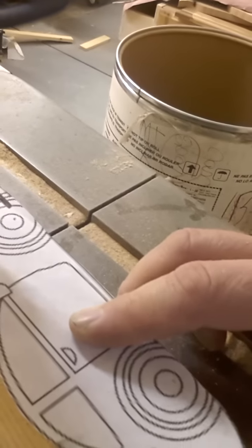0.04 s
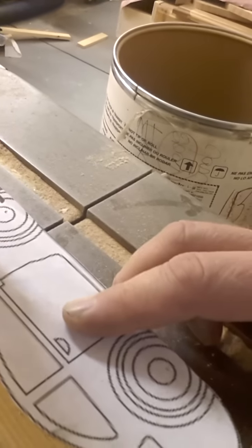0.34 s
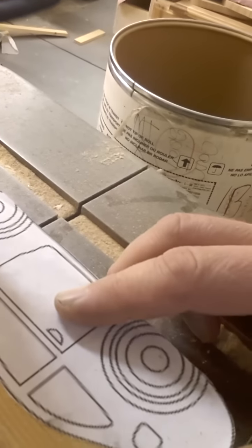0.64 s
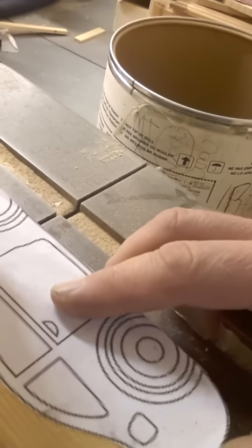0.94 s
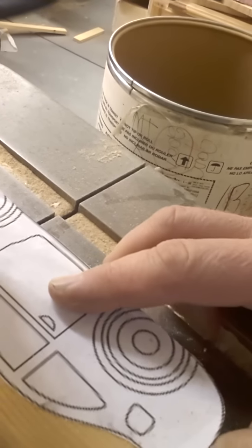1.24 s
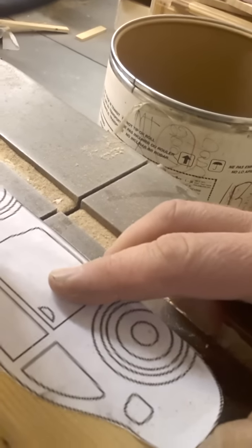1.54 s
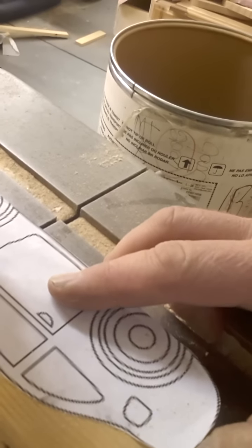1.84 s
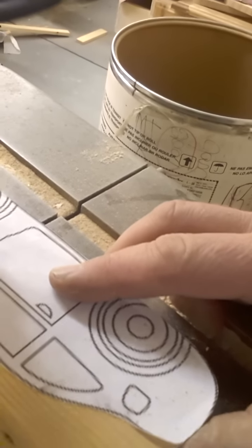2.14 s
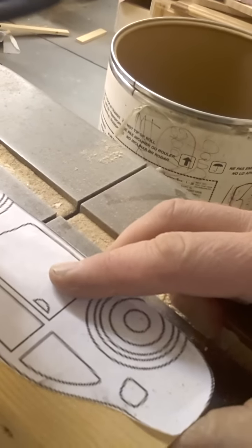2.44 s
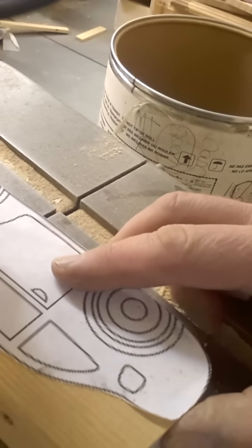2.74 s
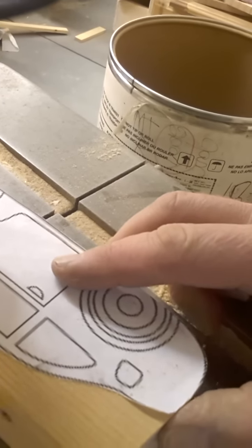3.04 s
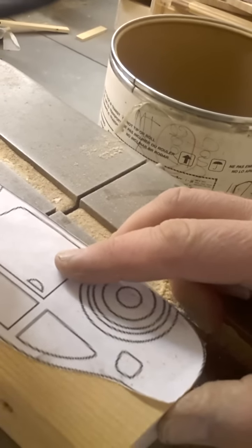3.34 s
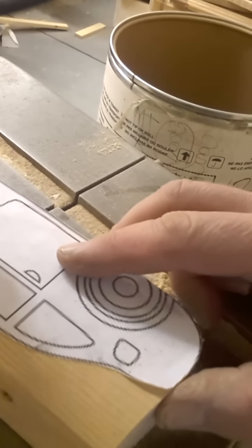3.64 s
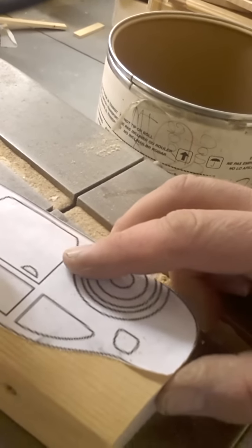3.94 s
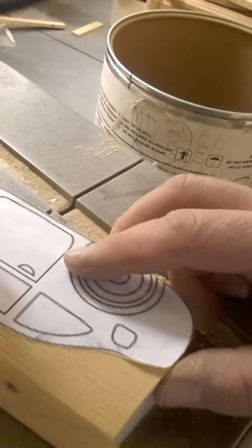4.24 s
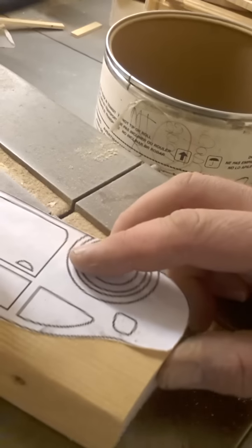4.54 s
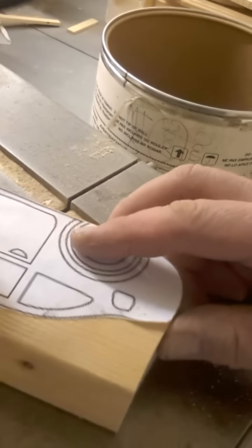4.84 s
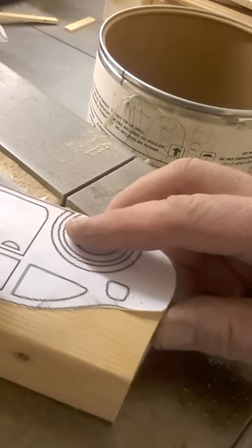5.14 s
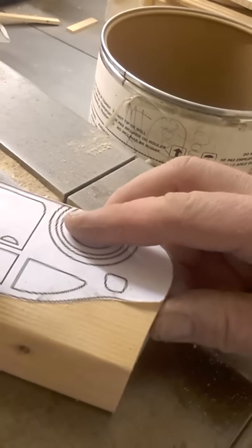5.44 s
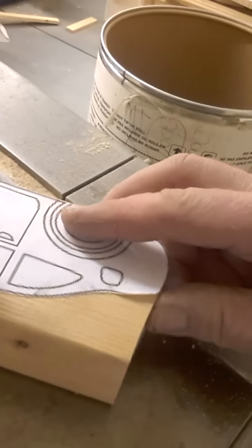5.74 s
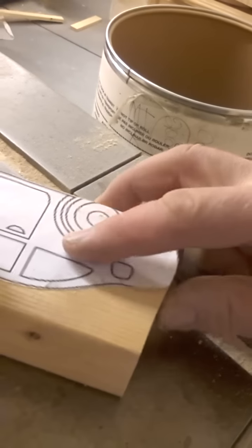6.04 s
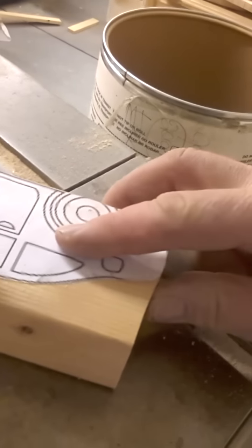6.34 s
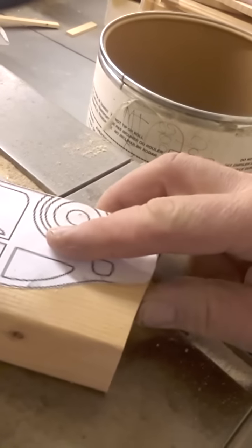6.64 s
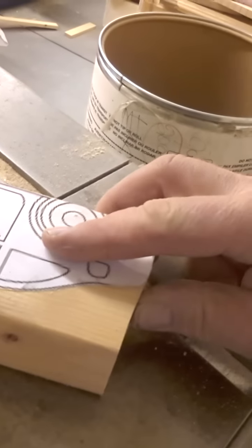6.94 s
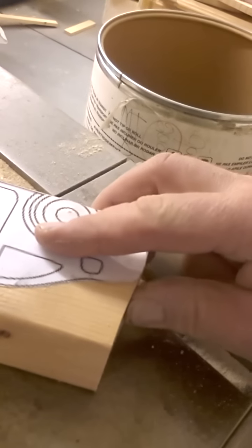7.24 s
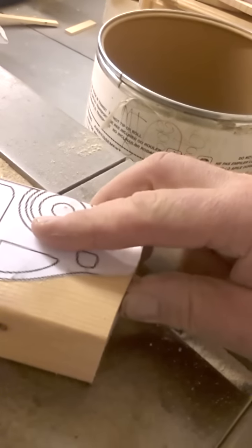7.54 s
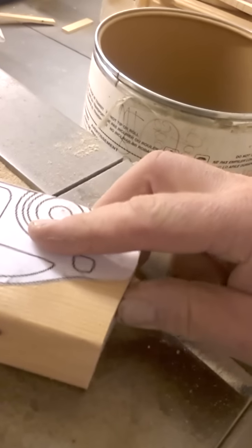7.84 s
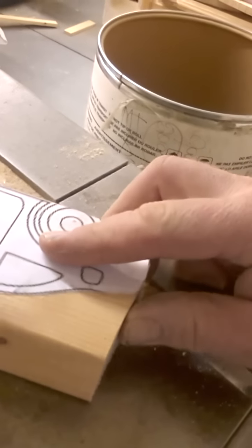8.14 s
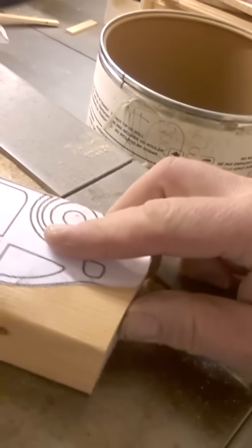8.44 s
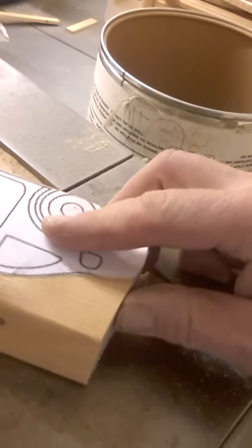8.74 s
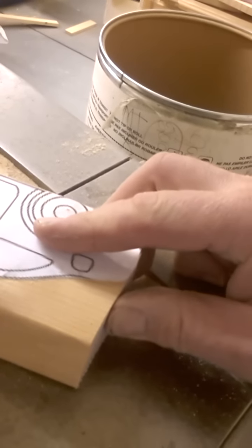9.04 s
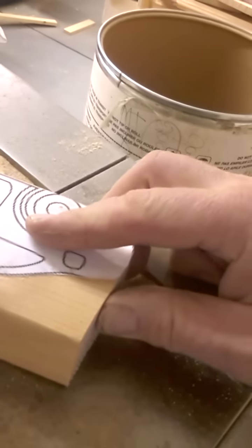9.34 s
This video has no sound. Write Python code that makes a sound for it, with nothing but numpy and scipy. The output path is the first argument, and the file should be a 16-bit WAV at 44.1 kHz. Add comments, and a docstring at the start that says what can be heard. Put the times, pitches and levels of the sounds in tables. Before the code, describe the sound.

A bandsaw rasps and squeals through a wooden board up close, its steel blade chattering over a humming motor.

```python
"""You hear a bandsaw rasp and squeal as it cuts a curve in a softwood board, up close in a small workshop.
The teeth tear the wood and set the steel band ringing. The band slaps its guides in a pattern that
returns with every lap, and squeals as the board twists it. In the turn the hand pushes and eases by
fits; twice it pushes long and hard, the teeth bite and the squeal is choked.
Underneath, the motor hums and the frame rumbles."""
import sys
import numpy as np
from scipy import signal
from scipy.fft import rfft, irfft
from scipy.io import wavfile
from scipy.ndimage import uniform_filter1d

SR = 44100
rng = np.random.default_rng(int(sys.argv[2]) if len(sys.argv) > 2 else 0)


def transcribe(u):
    """Save the signal u as a 16-bit wav file named by the first command-line argument.

    u: samples, shape (n,) or (channels, n), limited to [-1, 1]; the rate is SR.
    q: integer samples, one column per channel.
    """
    v = np.clip(np.atleast_2d(u).T, -1, 1)
    q = np.round(v * 32767).astype(np.int16)
    wavfile.write(sys.argv[1], SR, q)


N = 423360
TIME, FREQS = np.arange(N) / SR, np.fft.rfftfreq(N, 1 / SR)
LAP_HZ = 4.214  # laps of the band each second

# How hard the teeth drum on the wall of the cut. Each row: time in seconds, contact in dB.
WALL_CONTACT = [(0, -6), (.6, -6), (1.2, 3), (2.2, -1), (2.8, 2.5), (4.4, 6.5), (5.1, 3), (5.6, -1),
                (6.6, -2.5), (7.5, -1.5), (8.7, -4.5), (9.6, -3)]
# Turning the board presses the band sideways. Each row: time in seconds, pressure from 0 to 1.
SIDE_PRESSURE = [(0, 0.4), (3.4, 0.16), (4.5, 0.5), (5.7, 0.42), (6.1, .2), (6.5, 0.33), (7.4, 0.3),
                 (8.8, 0.5), (9.6, 0.25)]
# How far the left channel runs ahead of the right. Each row: frequency in Hz, lead in radians.
LEFT_LEAD = [(100, 0.77), (300, 0.22), (600, 1.58), (1200, 1.6), (2400, 1.38), (3600, 0.93), (5000, 1.7),
             (5700, 1.65), (7500, 1.1), (12000, 2.1)]


def steel_band(tearing, force, slack_db):
    """The teeth ring the band's modes (its natural tones); some of them shift as it twists."""
    # Each row: pitch in Hz, width in Hz, relative level in dB, left over right in dB.
    chatter_modes = [(3413, 200, 12.5, 2.4), (3765, 170, 15, 3.6), (3960, 310, 6.5, 2.3)]
    sizzle_modes = [(7500, 3900, -15, 11), (7520, 590, -7, -33.5), (8020, 440, -7.5, -23),
                    (8930, 420, 0.5, -6.5)]
    edge_modes = [(10770, 1860, -15.5, 3)]
    # The shifting modes. Each row: time in seconds, then chatter, sizzle and whistle pitch in Hz.
    twist = [(0, 3410, 7180, 11500), (1.6, 3320, 7020, 11100), (2.5, 3654, 6880, 10960),
             (4.3, 3575, 6820, 11090), (5.6, 3476, 6880, 11300), (7.15, 3610, 6870, 11440),
             (7.6, 3560, 7520, 11050), (9.6, 3360, 7410, 10730)]
    chatter_hz, sizzle_hz, whistle_hz = follow(twist)
    contact_db = follow(WALL_CONTACT)[0] - slack_db
    pressure, = follow(SIDE_PRESSURE)
    # the teeth stick out sideways and drum on the wall of the cut
    drumming = teeth(tear_db=1.5, lap_db=2.3, grain_db=0.8, bump_db=3.5)
    chatter = ring(drumming, chatter_modes) + amp(15) * pan(1.9) * resonate(teeth(), chatter_hz, 150)
    chatter = signal.sosfilt(signal.butter(6, 3100, "high", fs=SR, output="sos"), chatter)
    # each slap against the guide throws the teeth harder at the wall
    _, slap_pulse = slaps()
    chatter = at_level(chatter * (1 + 0.8 * slap_pulse), -23.5 + contact_db + 2 * force)
    # firm contact sharpens the sizzle into one moving mode
    sharp_mode = amp(6 + 0.74 * contact_db) * pan(-10) * resonate(teeth(), sizzle_hz, 340)
    sizzle = at_level(ring(tearing, sizzle_modes) + sharp_mode, -26.5 + 0.82 * contact_db + 6 * force)
    # past a certain side pressure the band's edge whistles louder
    whistle = pressure * pan(-17.5) * resonate(teeth(), whistle_hz, 330) + ring(tearing, edge_modes)
    whistle_db = -34.5 + 0.56 * contact_db + 22 * np.maximum(pressure - 0.22, 0)
    return chatter + sizzle + at_level(whistle, whistle_db)


def teeth(tear_db=1.5, lap_db=2.0, grain_db=1, bump_db=0.5, bumps_per_lap=33):
    """Teeth tear fibres; their unevenness repeats each lap, the grain of the wood does not."""
    laps = LAP_HZ * TIME
    uneven = np.interp(laps % 1 / LAP_HZ, TIME, wander(38))
    bumps = np.sin(2 * np.pi * bumps_per_lap * laps)
    tears = stereo_noise()
    return tears * amp(tear_db * wander(740) + lap_db * uneven + grain_db * wander(18) + bump_db * bumps)


def guides(load, slack_db, glide_s=0.0045, rest_hz=5725):
    """The band at its guides: slaps that chirp downward, a rubbed ring, and a throbbing squeal."""
    # Each row: time in seconds, relative level in dB, pitch in Hz, chirp's fall as a share of the pitch.
    slap_curve = [(0, -19.5, 5160, 0.41), (.8, -18, 4935, 0.2), (1.8, -22, 5010, 0.18),
                  (3.3, -22, 5090, 0.14), (4.8, -24, 5090, 0.23), (5.75, -21, 5450, .13),
                  (6.7, -24.5, 5520, 0.17), (7.3, -20, 5150, 0.28), (7.8, -21, 5020, 0.26),
                  (8.4, -19.5, 5220, 0.13), (8.75, -21.5, 4930, 0.092), (9.6, -21, 4980, 0.089)]
    # The twisted band squeals. Each row: time in seconds, relative level in dB.
    squeal_curve = [(0, -20.5), (.6, -20.5), (1.8, -16), (3.4, -21), (4.3, -20), (5.2, -22.5), (6.3, -20),
                    (6.95, -15.5), (7.3, -27.5), (7.9, -31), (8.38, -20.5), (8.6, -41), (9.05, -29.5),
                    (9.6, -22)]
    slap_db, slap_hz, glide = follow(slap_curve)
    slap_db = slap_db - 11 * load - 0.57 * slack_db
    squeal_db = follow(squeal_curve)[0] - 4.5 * load - 0.57 * slack_db
    squeal_hz = rest_hz + 290 * load + 18 * wander(3.1)
    # hard contact with the wall of the cut shakes the squeal and makes it rough
    squeal_hz += 28 * np.maximum(follow(WALL_CONTACT)[0] - 1, 0) * wander(230)
    pressure, = follow(SIDE_PRESSURE)
    age_s, pulse = slaps()
    friction, rubbing = stereo_noise(), stereo_noise()
    # high bending waves travel faster in steel, so each slap falls in pitch
    fall = np.exp(-age_s / glide_s) - 0.5
    chirps = saturate(resonate(friction, slap_hz * (1 + glide * fall), 560), 0.65)
    rubbed = saturate(resonate(rubbing, slap_hz, 130), 0.7)
    slap = pan(7.3) * (pulse * chirps / chirps.std() + 0.19 * (1 + pressure) * rubbed / rubbed.std())
    squeal = saturate(resonate(rubbing, squeal_hz + 110 * fall, 105), 0.65)
    # the squeal builds up just before each slap and is checked by it
    early_pulse = np.roll(uniform_filter1d(pulse, size=130), -130)
    throb = 0.35 + np.sqrt(abs(early_pulse))
    return at_level(slap, slap_db) + at_level(pan(5.4) * throb * squeal, squeal_db)


def slaps(per_lap=16.6, rise_s=0.0024):
    """Waves in the band hit the guide about 70 times a second: time since each hit, and its pulse."""
    lap, place = np.divmod(LAP_HZ * TIME, 1)
    number, part = np.divmod(place * per_lap, 1)
    lap, number = lap.astype(int), number.astype(int)
    age_s = part / (per_lap * LAP_HZ)
    pattern, chance = rng.standard_normal(17), rng.standard_normal((42, 17))
    size_db = 1.8 * pattern[number] + 1.6 * chance[lap, number]
    return age_s, amp(size_db) * age_s / rise_s * np.exp(1 - age_s / rise_s)


def whines(width_hz=130):
    """Single modes of the band swell up while it binds in the cut, fed by the teeth."""
    # Each row: middle and length in seconds, pitch in Hz, relative level in dB, left over right in dB.
    binds = [(.25, 0.62, 5230, -20.5, 11), (1.25, 1.14, 8960, -27.5, -11), (1.3, .6, 8050, -31, -8),
             (1.25, 0.27, 3390, -26, 4), (3.302, 1.6, 7050, -24, -13), (5.5, 1, 5170, -25, 14),
             (6.142, 0.1, 3585, -15, 5), (7.135, 0.078, 3465, -16, 2), (7.864, 0.065, 3520, -15.5, 5),
             (8.09, .06, 4100, -22, 14), (8.26, 0.067, 4080, -20.5, 13), (8.75, .3, 4980, -27, 6),
             (9.3, 0.88, 4856, -21, 2)]
    tearing, out = teeth(), 0
    for middle_s, length_s, hz, db, side_db in binds:
        tone = resonate(tearing, hz, width_hz)
        out += amp(db) * pan(side_db) * swell(middle_s, length_s / 2) * tone / tone.std()
    return out


def free_ring(tearing, slack_db):
    """The free length of band rings, more strongly and in flares once the cut turns."""
    # Each row: pitch in Hz, width in Hz, relative level in dB, left over right in dB.
    modes = [(2318, 20, 0, 5), (2439, 22, -2, 5)]
    # Each row: time in seconds, relative level in dB.
    steady_ring = [(0, -45), (2.8, -39), (4.4, -40.5), (6.2, -38), (6.7, -34), (9.6, -33)]
    # Each row: middle and length in seconds, relative level in dB.
    flares = [(6.437, 0.043, -34), (6.55, .04, -33), (6.791, 0.049, -25), (6.903, 0.044, -33),
              (7.11, .08, -27), (7.21, .05, -22.5), (7.5, 0.097, -36), (7.757, 0.037, -24),
              (7.884, .11, -19.5), (8.494, 0.065, -33), (8.82, 0.12, -29), (9.17, 0.07, -53),
              (9.448, 0.14, -34)]
    gain = amp(follow(steady_ring)[0] - slack_db)
    gain += sum(amp(db) * swell(middle_s, length_s / 2) for middle_s, length_s, db in flares)
    return gain * at_level(ring(tearing, modes), -2.5)


def wood_and_dust(tearing, force, slack_db):
    """The dry rasp of torn wood, and the hiss of spraying sawdust that grows with it."""
    # Each row: frequency in Hz, relative level in dB.
    wood_spectrum = [(200, -25), (400, -2), (550, 9.5), (660, -1), (880, 1), (1000, 8), (1070, 7),
                     (1250, 11), (1550, 0.5), (2250, 5), (2900, 2), (4500, 3), (6400, 5.5), (15000, -17.5)]
    dust_spectrum = [(3000, -42), (7000, -41), (9000, -1), (9700, 13), (10500, -23), (11800, -14),
                     (12600, -20), (13600, 11), (14600, 3)]
    # Each row: time in seconds, relative level in dB. The feed is brisk at first and slow in the turn.
    feed = [(0, -34.5), (.6, -35), (1.2, -32.5), (4.2, -34), (5.6, -37), (6.7, -37.5), (9.6, -36)]
    dust_curve = [(0, -42), (1.2, -45), (2.2, -49), (3.6, -70), (4.8, -38.5), (7.8, -35.5), (8.8, -44),
                  (9.6, -27)]
    rasp_db = follow(feed)[0] + 6.5 + 9 * force - 0.66 * slack_db
    dust_db = follow(dust_curve)[0] + 0.17 * (rasp_db - rasp_db.mean()) - 0.66 * slack_db
    spray = teeth(tear_db=2, lap_db=1, grain_db=2.5, bump_db=1)
    rasp = at_level(colour(tearing, wood_spectrum), rasp_db)
    return rasp + at_level(colour(spray, dust_spectrum), dust_db)


def bite(tearing, force, load):
    """Under a hard push the board shakes on the table and scrapes the sides of the band."""
    # Each row: frequency in Hz, relative level in dB.
    shake_spectrum = [(30, -30), (70, -20), (100, -22), (125, 57), (160, -67), (200, -5), (400, -24),
                      (900, -50)]
    # Each row: pitch in Hz, width in Hz, relative level in dB, left over right in dB.
    scrape_modes = [(3460, 45, 28.5, -6), (4037, 86, 10.5, 26), (6770, 590, 6, -21), (7570, 610, 2, -7)]
    shake = at_level(colour(stereo_noise(), shake_spectrum), -27.5)
    scrape = at_level(ring(tearing, scrape_modes), -23)
    return load * shake + force ** 1.07 * scrape


def knocks(rise_s=0.0015, fall_per_s=25):
    """The band catches and knocks against a guide: a falling chirp with a crack in it."""
    # Each row: start in seconds, relative level in dB, pitch in Hz.
    hits = [(4.1144, -12, 5600), (6.6368, -16, 5750), (7.2938, -10.5, 5400), (8.537, -16, 5100),
            (8.5517, -21, 5200), (8.5954, -7, 5130), (8.6515, -11, 5330), (8.954, -7.5, 5180),
            (8.985, -17, 5000), (9.0703, -16, 4970), (9.1945, -17, 5050)]
    out, t = np.zeros((2, N)), np.arange(SR // 50) / SR
    envelope = t / rise_s * np.exp(1 - t / rise_s)
    for start_s, db, hz in hits:
        chirp = np.sin(2 * np.pi * hz * (t - fall_per_s * (t - rise_s) ** 2 / 2))
        crack = 0.39 * rng.standard_normal((2, len(t)))
        start = round(start_s * SR)
        out[:, start:start + len(t)] += amp(db + 0.5) * (chirp + crack) * envelope
    return pan(1.6) * out


def sway():
    """The loose band leans into the wood and away again, so all its modes pulse together."""
    # Each row: time in seconds, rough depth of the pulsing in dB.
    depths = [(0, 1.7), (1.5, 2), (2.3, 2.5), (3.2, 2.5), (4.2, 2.3), (5.2, 1.2), (6, -0.1), (7.4, 1.9),
              (8.1, -1), (8.6, 3), (9.6, 2)]
    # Each row: swings per lap, strength as a factor.
    swings = [(8, .8), (9, .7), (14, .4), (15, .45), (16, .4)]
    lean = sum(size * np.sin(2 * np.pi * (rate * LAP_HZ * TIME + rng.random())) for rate, size in swings)
    gain = amp(follow(depths)[0] * np.tanh(0.7 * lean + 0.3 * wander(60)) / 0.6)
    return gain / np.sqrt(uniform_filter1d(gain ** 2, size=10000))


def hand(ramp_s=0.025, lag_s=0.035):
    """The hand's force on the board, the load that lags behind it, and the slack when it eases off."""
    # Each row: start and length in seconds, force from 0 to 1.
    pushes = [(0.244, .025, .8), (0.422, 0.054, 0.52), (0.907, 0.052, 0.34), (5.83, 0.4, 0.89),
              (6.75, .08, 0.34), (7.065, 0.11, 0.77), (7.32, 0.042, 0.6), (7.47, 0.045, .4),
              (7.589, 0.046, 1), (7.697, 0.089, 0.76), (7.801, 0.49, 0.9), (8.555, 0.052, 0.4),
              (8.813, 0.12, 0.1), (9.353, 0.049, 0.4), (9.452, 0.044, 0.9)]
    # The teeth run almost free. Each row: middle and length in seconds, drop in contact in dB.
    letups = [(0.296, .03, 6), (1.012, 0.019, 8), (6.626, 0.02, 4), (6.963, 0.047, 4), (7.31, 0.014, 13),
              (7.43, 0.073, 3.5), (7.55, 0.02, 9), (7.67, 0.022, 4), (8.365, 0.025, 7), (8.527, 0.018, 13),
              (8.693, 0.055, 3.5), (8.765, 0.03, 6), (8.977, 0.022, 10), (9.058, .022, 11),
              (9.324, 0.029, 5)]
    force = slack_db = 0
    for start_s, length_s, size in pushes:
        end_s = start_s + length_s + ramp_s / 2
        force += size * np.clip(np.minimum(TIME - start_s, end_s - TIME) / ramp_s, 0, 1)
    for middle_s, length_s, db in letups:
        slack_db += db * np.clip(1.5 - 2 * abs(TIME - middle_s) / length_s, 0, 1)
    decay = np.exp(-1 / (lag_s * SR))
    load = signal.lfilter([1 - decay], [1, -decay], force ** 2)
    return force, np.minimum(load, force), slack_db


def motor():
    """Mains hum and bearing whine: steady tones that waver a little."""
    # Each row: pitch in Hz, level in dB, waver in Hz.
    tones = [(120.1, -39, 0.26), (230.5, -60, 0.12), (477, -48.5, 0.88), (995, -49, 5.8),
             (1164, -44.5, 6.95), (1308, -41, 3.56), (1754, -48, 4.85)]
    hum = 0
    for hz, db, waver_hz in tones:
        phase = 2 * np.pi * np.cumsum(hz + waver_hz * wander(21.8)) / SR
        lead = np.interp(hz, FREQS, spectrum(LEFT_LEAD))
        hum += np.sqrt(2) * amp(db) * np.sin([phase, phase - lead])
    return hum


def drive_throb(hz=239.2, waver_hz=1.3):
    """The drive throbs; each listed swell stands for its tone falling into step with the hum."""
    # Each row: middle in seconds, relative level in dB.
    throbs = [(.02, -21), (.45, -30.5), (.96, -24.5), (1.4, -25.5), (1.8, -24), (2.32, -23.5),
              (2.66, -26.5), (3.12, -27.5), (3.47, -25), (3.96, -30.5), (4.62, -30), (4.9, -30),
              (5.35, -24), (5.78, -28.5), (6.09, -19), (6.45, -36), (6.75, -31.5), (7.1, -23.5),
              (7.48, -26.5), (7.78, -25), (8.17, -16), (8.58, -28.5), (8.87, -28), (9.4, -29)]
    tone = np.sqrt(2) * np.sin(2 * np.pi * np.cumsum(hz + waver_hz * wander(5.3)) / SR)
    return pan(0.45) * tone * sum(amp(db - 3) * swell(middle_s, 0.11) for middle_s, db in throbs)


def frame_rumble(load):
    """The sheet-steel frame rumbles, louder under load."""
    # Each row: frequency in Hz, relative level in dB.
    frame_spectrum = [(25, -61), (50, -42), (75, -27.5), (105, -18), (150, -14.5), (175, -19.5), (215, -5),
                      (295, 0), (350, -2.5), (385, -12), (415, -5.5), (460, -30), (700, -18.5), (1500, -41)]
    return at_level(colour(stereo_noise(), frame_spectrum), -30 + 7 * load)


def workshop(x, fade_s=0.093, patterns=12):
    """Short echoes from table and walls; they keep changing as hands and board move."""
    t, out = np.arange(SR // 4) / SR, 0
    fade = amp(-60 * t / fade_s) * (t > 0.002)
    for k in range(patterns):
        echoes = rng.standard_normal((2, len(t))) * (rng.random((2, len(t))) < 0.06) * fade
        echoes /= np.linalg.norm(echoes[0])
        share = np.maximum(1 - abs(np.linspace(0, patterns - 1, N) - k), 0)
        out += signal.oaconvolve(x * np.sqrt(share), echoes, axes=1)[:, :N]
    return out


def stereo_noise():
    """Noise that is partly alike on the left and right."""
    # Each row: frequency in Hz, likeness from 0 to 1.
    likeness = [(30, .7), (100, .96), (300, .95), (600, .45), (1300, .45), (2400, .85), (3600, .85),
                (5500, .8), (8000, .65), (12000, .5)]
    left, other = rfft(rng.standard_normal((2, N)))
    same = np.clip(spectrum(likeness), 0, 1)
    right = (same * left + np.sqrt(1 - same ** 2) * other) * np.exp(-1j * spectrum(LEFT_LEAD))
    return irfft(np.array([left, right]), N)


def colour(x, points):
    """Filters a sound by a spectrum; the machine shades each side differently."""
    # Each row: frequency in Hz, left over right in dB.
    shading = [(100, 0), (300, 0), (600, 4), (2000, 4), (5500, 12), (7500, -2), (10000, -8), (14000, -7)]
    return irfft(rfft(x) * amp(spectrum(points) + np.outer([0.5, -0.5], spectrum(shading))), N)


def resonate(x, hz, width_hz):
    """One sharp resonance that can follow a pitch curve."""
    turn = np.exp(2j * np.pi * np.cumsum(hz * np.ones(N)) / SR)
    decay = np.exp(-np.pi * width_hz / SR)
    smoothed = signal.lfilter([(1 - decay) ** 2], [1, -2 * decay, decay ** 2], x * turn.conj())
    return 2 * (turn * smoothed).real


def ring(x, modes):
    """Rings a set of modes, each sounding toward its own side."""
    power = sum((amp(db) * pan(side_db) / (1 + (2 * (FREQS - hz) / width_hz) ** 2)) ** 2
                for hz, width_hz, db, side_db in modes)
    return irfft(rfft(x) * np.sqrt(power), N)


def saturate(x, amount):
    """Friction limits a self-fed vibration, which evens out its swing."""
    return x / (abs(signal.hilbert(x)) + 0.6 * x.std()) ** amount


def at_level(x, db):
    """Makes a stereo sound follow a level curve and keeps its fast flutter."""
    power = uniform_filter1d(uniform_filter1d(x.mean(0) ** 2, size=6000), size=4000)
    return x * amp(db) / np.sqrt(abs(power) + 1e-20)


def wander(per_s):
    """A smooth random curve that changes about per_s times a second."""
    x = irfft(rfft(rng.standard_normal(N)) / (1 + (FREQS / per_s) ** 4), N)
    return x / x.std()


def swell(middle_s, half_length_s):
    """A smooth rise and fall around one moment."""
    return 1 / (1 + ((TIME - middle_s) / half_length_s) ** 4)


def follow(table):
    """Turns a table over time into one curve per column."""
    seconds, *columns = np.transpose(table)
    return [np.interp(TIME, seconds, column) for column in columns]


def spectrum(points):
    """Turns a table over frequency into a curve."""
    hz, value = np.transpose(points)
    return np.interp(np.log(FREQS + 1), np.log(hz), value)


def pan(db):
    """Left and right gains for a level difference."""
    return amp([[db / 2], [-db / 2]])


def amp(db):
    """Decibels to gain."""
    return 10 ** (np.asarray(db) / 20)


def scene():
    """The hand sets the load; the same teeth drive wood and band; the machine runs underneath."""
    tearing, pulsing = teeth(), sway()
    force, load, slack_db = hand()
    blade = pulsing * (steel_band(tearing, force, slack_db) + free_ring(tearing, slack_db))
    blade += np.sqrt(pulsing) * (guides(load, slack_db) + whines())
    cutting = blade + wood_and_dust(tearing, force, slack_db) + bite(tearing, force, load) + knocks()
    room = amp(-13) * workshop(cutting)
    return amp(-2.05) * cutting + room + motor() + drive_throb() + frame_rumble(load)


def record(dry, ceiling=0.93, cutoff_hz=14650):
    """Rounds off the loudest peaks, then removes the highest treble."""
    limited = dry / (1 + (dry / ceiling) ** 8) ** (1 / 8)
    low_pass = signal.firwin(511, cutoff_hz, window=("kaiser", 8), fs=SR)
    return signal.oaconvolve(limited, low_pass[None], "same", axes=1)


dry = scene()
out = record(dry)
transcribe(out)
```